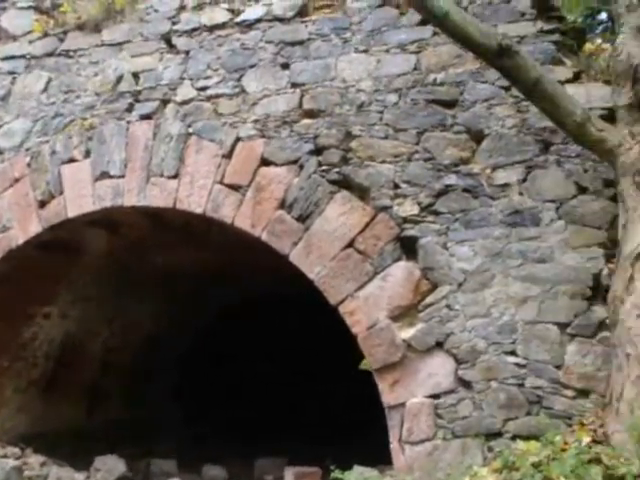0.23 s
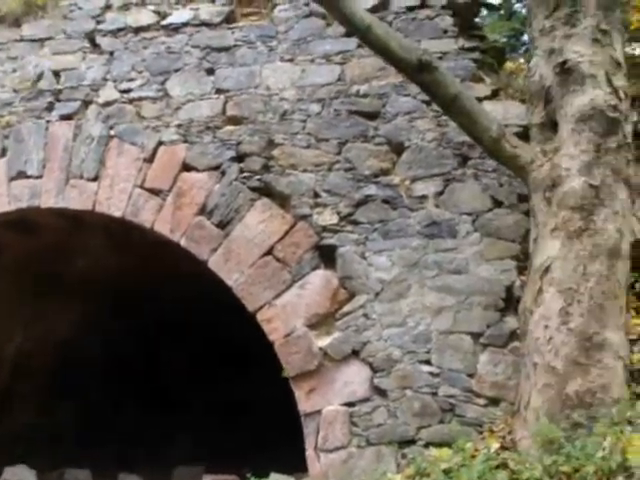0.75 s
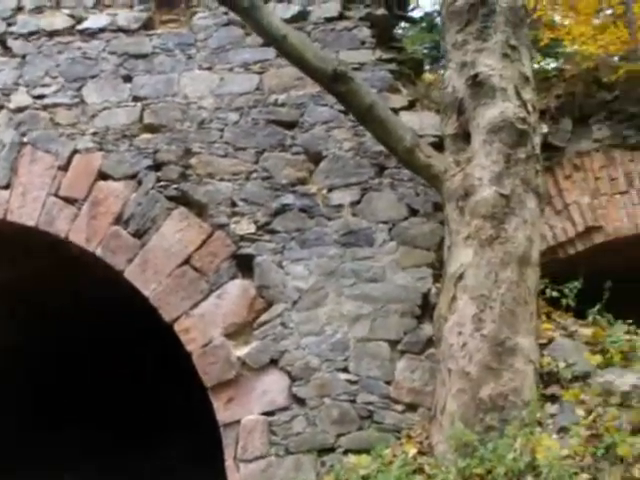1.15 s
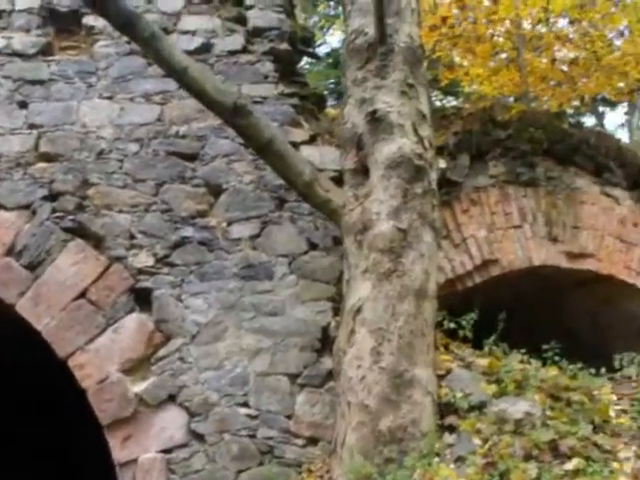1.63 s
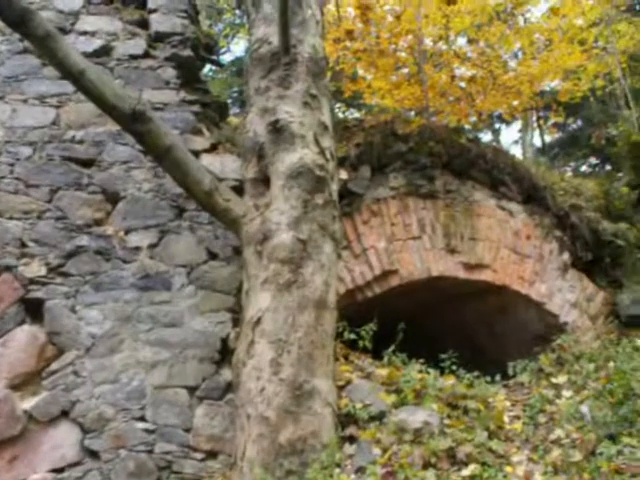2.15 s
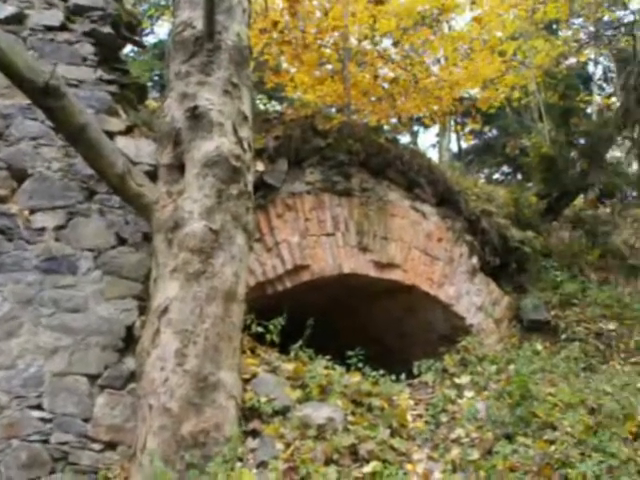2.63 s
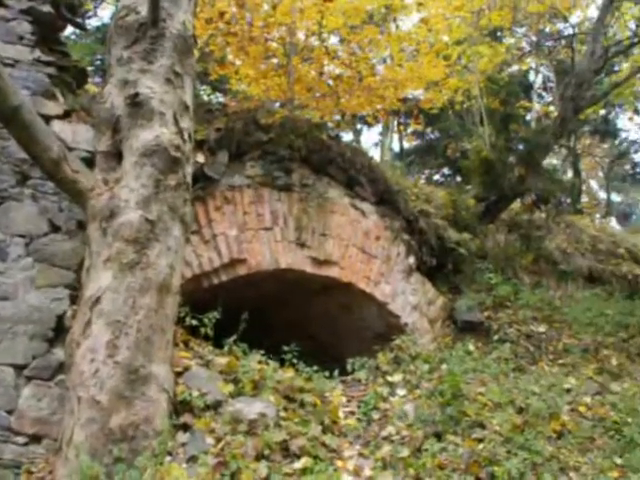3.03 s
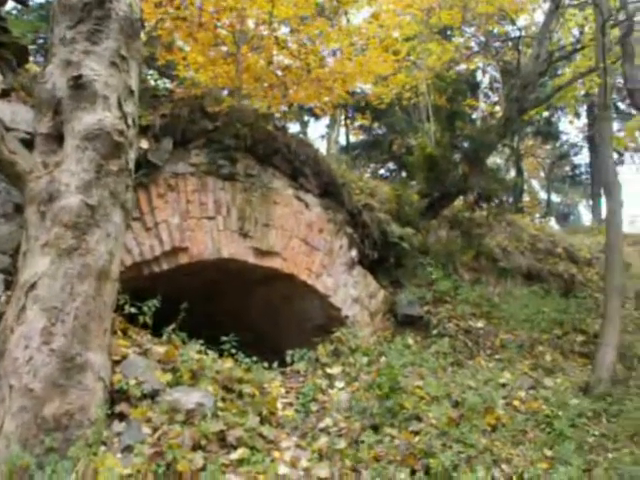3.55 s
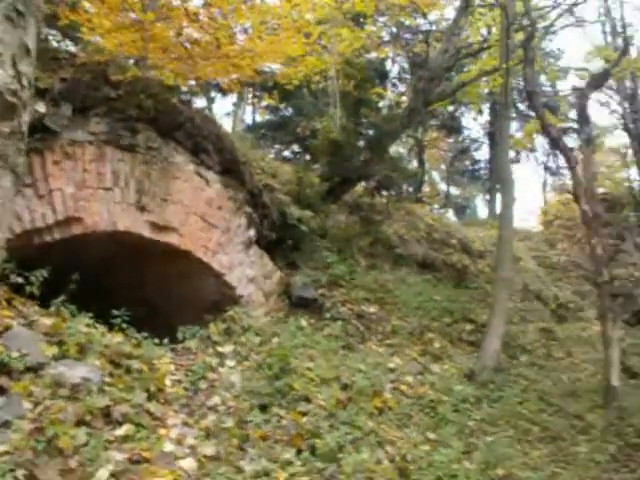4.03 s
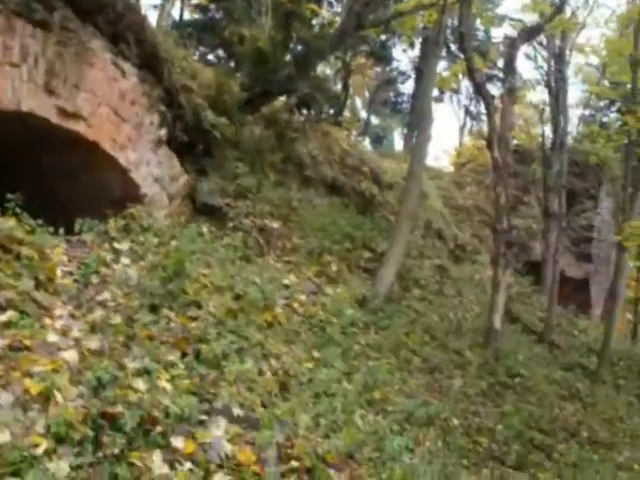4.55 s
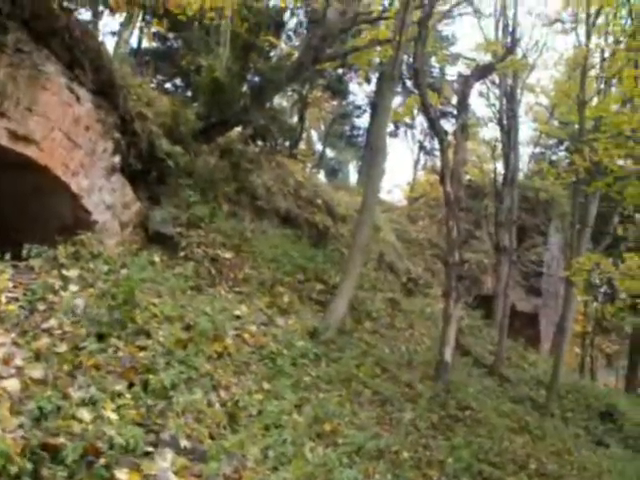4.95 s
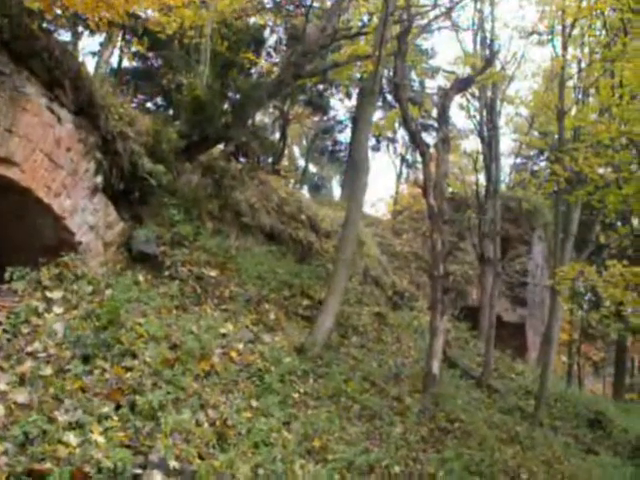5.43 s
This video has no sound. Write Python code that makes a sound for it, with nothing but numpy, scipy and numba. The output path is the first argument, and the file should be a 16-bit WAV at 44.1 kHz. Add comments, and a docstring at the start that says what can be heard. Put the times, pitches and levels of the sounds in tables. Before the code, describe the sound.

A steady hiss with a faint high whine runs throughout, over a soft, uneven wind rumble. From about 0.3 seconds, dry leaves rustle faintly under shifting feet in a wood, with a light tap on the handheld camera at 0.7. The rustle grows between 1.4 and 1.9 seconds, and several brittle leaf snaps follow one another until 2. Close, sharp knocks on the camera's plastic casing ring briefly at about 1.4, 2 and 2.2 seconds, then loudest at 2.9, 3.6 and 4.1, with lighter taps between. More leaves snap from 4.2 to 4.7 seconds. From 4.8 to 5.3, fingers scrape and tap on the casing in quick little strokes while low puffs of wind hit the microphone. The wind rumble swells around 4.8 seconds and again at the end, near 5.6.

```python
"""Dry leaves and a handheld camera

Someone shifts their feet in a wood, and dry leaves rustle and snap below. The small camera in their
hand rings when its plastic casing is knocked and scrapes when fingers slide over it. Wind rumbles
and puffs on the microphone, over the amplifier's steady hiss and whine."""
import sys
import numpy as np
from scipy import signal
from scipy.fft import rfft, irfft
from scipy.io import wavfile
from scipy.ndimage import uniform_filter1d
from numba import njit

SR = 44100
rng = np.random.default_rng(int(sys.argv[2]) if len(sys.argv) > 2 else 0)


def store_wav(level_fs):
    """Save 16-bit WAV to argv[1]."""
    pcm = np.round(np.clip(np.atleast_2d(level_fs), -1, 1) * 32767)
    wavfile.write(sys.argv[1], SR, pcm.T.astype(np.int16))


N = 250488


def gain(db):
    return 10 ** (np.asarray(db) / 20)


def unit_level(x):
    return x / np.sqrt(np.mean(x ** 2))


def add_at(out, sound, start_s):
    i = int(start_s * SR)
    out[i:i + len(sound)] += sound[:N - i]


def curves(tables, rest_db=-65.0):
    """Join timed rows into one curve per column; the level sinks to rest between tables."""
    rows = []
    for table in tables:
        first, last = table[0], table[-1]
        rows += [(first[0] - .006, rest_db, *first[2:]), *table, (last[0] + .012, rest_db, *last[2:])]
    times, *columns = np.transpose(rows)
    return [np.interp(np.arange(N) / SR, times, column) for column in columns]


def wander(per_s):
    """A smooth random drift, about 1 in size, that heads for a new value per_s times a second."""
    hold = int(SR / per_s)
    steps = np.repeat(rng.standard_normal(N // hold + 1), hold)
    return 1.22 * uniform_filter1d(uniform_filter1d(steps, hold), hold)[:N]


LOW, BAND, HIGH = 0, 1, 2
@njit
def split(x, hz, damping):
    """Split a sound into what lies below (LOW), around (BAND) and above (HIGH) a moving frequency."""
    low, band = np.empty(len(x)), np.empty(len(x))
    band_memory, low_memory = 0., 0.
    for i in range(len(x)):
        step = np.tan(np.pi * hz[i] / SR)
        swing = (band_memory + step * (x[i] - low_memory)) / (1 + step * (step + damping))
        low[i], band[i] = low_memory + step * swing, damping * swing
        band_memory, low_memory = 2 * swing - band_memory, low_memory + 2 * step * swing
    return low, band, x - low - band


def ring(hz, db, fade_s, rise_s):
    """Tones set off by a push: they build over about rise_s and lose 60 dB in fade_s."""
    t = np.arange(SR // 5) / SR
    tones = np.sin(2 * np.pi * np.outer(hz, t)) * np.exp(-np.log(1000) * np.outer(1 / fade_s, t))
    return gain(db) @ tones * (1 - np.exp(-t / rise_s)) ** 2


def clicks(per_s, spread_db):
    """Random clicks, mostly small, a few larger."""
    hits = rng.random(N) < per_s / SR
    return unit_level(hits * rng.choice([-1., 1.], N) * gain(spread_db * rng.exponential(size=N)))


# How strong the hiss is from bass to treble: f/Hz, relative level/dB
HISS_SHAPE = [(60, -29), (100, 0), (360, -0.5), (700, -1.2), (2400, -2), (4900, -2.5), (5300, -6.5),
              (5520, -10.5), (5900, -11.5), (6300, -17.5), (6700, -28), (8100, -64)]
# The amplifier's two thin tones: f/Hz, level/dB
WHINE_TONES = [(5012, -56), (6013, -65)]
def amplifier(hiss_db=-36, readout_hz=59.94):
    """Two faint whines, and a smooth hiss that dips briefly each time the camera's sensor is read."""
    t = np.arange(N) / SR
    whine = sum(gain(db) * np.sqrt(2) * np.sin(2 * np.pi * hz * t) for hz, db in WHINE_TONES)
    shape_hz, shape_db = np.transpose(HISS_SHAPE)
    all_hz = np.fft.rfftfreq(N, 1 / SR) + 1
    shape = gain(np.interp(np.log(all_hz), np.log(shape_hz), shape_db))
    hiss = unit_level(irfft(rfft(rng.standard_normal(N)) * shape, N))
    cycles_from_dip = (t * readout_hz - .445 + .5) % 1 - .5
    dip_db = -9 * np.exp(-(cycles_from_dip / .035) ** 2)
    return hiss * gain(hiss_db + .72 * wander(1.8) + dip_db) + whine


# The rise and fall of the wind: t/s, level/dB
GUSTS = [(0, -41.5), (.4, -40), (.65, -45.5), (1.3, -39), (1.75, -47), (2.0, -46.5), (2.17, -39.5),
         (2.35, -47.5), (2.56, -41.5), (3.2, -45), (3.55, -42), (3.75, -46.5), (4.0, -39.5), (4.15, -46.5),
         (4.6, -34), (4.8, -29.5), (5.15, -40.5), (5.4, -35), (5.65, -22.5), (5.68, -22.5)]
def wind():
    """Air swirling at the microphone makes an uneven rumble that reaches higher in stronger gusts."""
    db = curves([GUSTS])[0]
    edge_hz = np.clip(45 * gain(.34 * (db + 41)), 15, 300)
    rumble = split(rng.standard_normal(N), edge_hz, 1.7)[LOW]
    rumble = split(rumble, 5.3 * edge_hz, 1.8)[LOW] / np.sqrt(edge_hz)
    rumble = split(rumble, .17 * edge_hz, 1.2)[HIGH]
    return gain(db + 2.5 * wander(7.9)) * unit_level(rumble)


# Two stretches of leaves stirring underfoot, each with rows of: t/s, level/dB, centre f/Hz
LEAF_RUSTLES = [
    [(.3, -45.5, 1240), (.53, -48, 1506), (.62, -54, 1510), (.7, -45, 2180), (.78, -42.5, 2810),
     (.86, -68, 2510), (1.3, -45.5, 1460)],
    [(1.45, -36.5, 1030), (1.53, -38.5, 1175), (1.63, -34, 1180), (1.7, -36.5, 1280), (1.76, -43.5, 1184),
     (1.9, -50, 1106)],
]
def leaf_rustle():
    """Thousands of tiny cracks in dry leaves blur into a soft rustle."""
    db, hz = curves(LEAF_RUSTLES)
    cracks = clicks(per_s=6000, spread_db=1.5)
    for _ in range(2):
        cracks = split(cracks, hz, 1.5)[BAND]
    return gain(db + .59 * wander(40)) * unit_level(cracks)


# The tones the casing rings with; the last three are the dry crack of contact:
# f/Hz, level/dB when hit on the face, level/dB when hit on the edge, fade t/s
CASING_TONES = [(414.6, -16.5, 16.5, 0.14), (490, -13, -12, 0.22), (514, 5.5, 7, 0.087),
                (768, -3, 3, 0.094), (848.6, 0, 0.5, 0.08), (942, 5.5, 7.5, 0.04), (1003, -3, -19, 0.02),
                (1104, -7, -10.5, 0.042), (1361, -8.5, -20.5, 0.047), (1469, -11.5, -7.5, 0.058),
                (1548, -4, -5, 0.039), (1641, -4.5, -4, 0.043), (1697, -3.5, -16, 0.049),
                (1866, -1.5, -2.5, 0.049), (2110, -6, -7.5, 0.056), (2212, -11, -22, 0.063),
                (2597, -8, 10, 0.03), (2740, -5, 1.5, 0.039), (3180, 2, 4.5, 0.028),
                (3500, -2.5, 3.5, 0.03), (4076, -0.5, -11.5, 0.036), (1397, -1, -6.5, 0.0078),
                (1946, -4.5, -7, .014), (3435, 3, 9, 0.0091)]
# Borders between the tones of the shell, back panel, lid, front panel and small parts: f/Hz
PART_BORDERS = [620, 1100, 1590, 2450]
# Blows on the casing: t/s, front panel level/dB, shell and lid level/dB (each relative to the front),
# fade time multiplier, where it lands (0 face, 1 edge), push t/ms
CASING_KNOCKS = [(0.698, -24, -10.5, 4, 0.41, 0.65, 0.29), (1.430, -6.5, -11, 3.5, 0.65, 0.1, 0.57),
                 (1.438, -18.5, 0.5, -8, 0.92, 0.18, 1.3), (1.950, -12.5, -17.5, 3.5, 0.88, 0.88, 1.1),
                 (2.2268, -7, -10, 4.5, 0.87, 0.08, 0.5), (2.270, -20.5, -12.5, 2.5, 0.92, 0.2, 0.32),
                 (2.933, 2, -15.5, 0.5, 0.94, 0.08, 0.91), (2.9417, -9, -4.5, 4, 0.87, 0.07, 0.4),
                 (3.021, -19.5, -6.5, 10, 0.68, 0.4, 0.88), (3.5797, 5.5, -13, -5, 0.96, 0.08, 0.69),
                 (3.586, -4.5, -8, -7, 0.44, 0.3, 0.6), (3.947, -23.5, -10, 3.5, 0.76, .7, 0.44),
                 (4.0018, -12.5, -9.5, 6, 0.53, 0.4, 0.57), (4.058, -32, -9, -2, 0.67, 0.94, 0.74),
                 (4.1276, 2.5, -19, -0.5, 0.56, 0.44, 0.7), (4.184, -22.5, -13.5, 4.5, 0.97, .4, 0.71),
                 (4.8315, -14.5, -10, -3.5, 1.17, 0.33, .4), (5.0916, -31, -6, 3, .6, 0.3, .5),
                 (5.131, -28, -17, -3, .53, 0.5, .5), (5.1533, -12.5, -20, -4.5, 0.52, 0.1, 0.14),
                 (5.2051, -11.5, -10, -2, 0.71, 0, 0.66), (5.234, -17, -14, -6, 0.76, 0.3, 0.46),
                 (5.285, -28, -15, 1.5, .4, 0.4, .4)]
def casing_knocks():
    """Each blow rings all the casing's tones, coloured by where it lands; the grip detunes them a bit."""
    hz, face_db, edge_db, fade_s = np.transpose(CASING_TONES)
    part = np.searchsorted(PART_BORDERS, hz)
    out = np.zeros(N)
    for start, front_db, shell_db, lid_db, fade_scale, edge, push_ms in CASING_KNOCKS:
        detune, scatter = rng.standard_normal((2, len(hz)))
        db = face_db + edge * (edge_db - face_db) + 1.2 * scatter
        back_db = -15 + 16.5 * edge  # edge blows wake the back panel
        small_parts_db = lid_db - 14  # they sit on the lid and move with it
        db += front_db + np.array([shell_db, back_db, lid_db, 0, small_parts_db])[part]
        add_at(out, ring(hz * (1 + .004 * detune), db, fade_s * fade_scale, push_ms / 1000), start)
    return split(out, np.full(N, 320.), 2.54)[HIGH]  # so small a box gives off no bass


# Single leaves breaking: t/s, level/dB, crack f/Hz, relative thud level/dB
LEAF_SNAPS = [(1.5907, -11, 2250, -5), (1.6408, -14, 2550, -5.5), (1.7728, -13.5, 2480, -2),
              (1.8362, -15.5, 2500, -2), (1.8815, -16.5, 2280, -5), (2.03, -13.5, 2500, -4.5),
              (4.2111, -8, 2230, -11), (4.438, -17.5, 2500, -9), (4.5, -17, 2760, -10),
              (4.594, -13, 2750, -13), (4.645, -22.5, 1780, -11), (4.658, -23, 1910, -14)]
def leaf_snaps():
    """A brittle leaf gives a very short crack, with a thud about an octave below and a spray above."""
    out = np.zeros(N)
    fade_s = np.array([.0092, .011, .011, .0069, .0032])
    for start, db, crack_hz, thud_db in LEAF_SNAPS:
        tones_hz = crack_hz * np.array([.46, .9, 1.15, 1.6, 2.2])
        tones_db = db + np.array([thud_db, -3, -5, -7, -11])
        add_at(out, -ring(tones_hz, tones_db, fade_s, rise_s=.0001), start)
    return out


# Fingers sliding on the casing: start t/s, length t/s, level/dB, extra treble level/dB
FINGER_SLIDES = [(2.271, 0.022, -36, 9), (4.838, .02, -38.5, 1), (4.869, 0.038, -33, 2),
                 (4.92, 0.033, -51, -4), (5.003, 0.051, -43, -6.5), (5.133, 0.031, -29.5, -1.5),
                 (5.205, 0.036, -33.5, -0.5), (5.259, 0.038, -46, -3), (5.307, .015, -43.5, -4)]
def finger_rubs(grip_s=.008, fade_db_per_s=59, let_go_db_per_s=899):
    """Skin sticks and slips in tiny jerks that ring the casing, while the hand shortens the ringing."""
    hz, face_db, edge_db, fade_s = np.transpose(CASING_TONES)
    part_db = np.array([-12, -10, 2.5, 5, -14])[np.searchsorted(PART_BORDERS, hz)]
    tones_db = (face_db + edge_db) / 2 + part_db
    out = np.zeros(N)
    for tones, treble_share in ((hz < PART_BORDERS[1], -.5), (hz > PART_BORDERS[1], .5)):
        pressure = np.zeros(N)
        for start, length, db, treble_db in FINGER_SLIDES:  # grip quickly, fade slowly, let go
            t = np.arange(N) / SR - start
            grip = np.clip(1 + t / grip_s, 0, 1)
            fade_db = fade_db_per_s * np.maximum(t, 0) + let_go_db_per_s * np.maximum(t - length, 0)
            pressure += grip * gain(db + treble_share * treble_db - fade_db)
        slips = clicks(per_s=1600, spread_db=1) * pressure * gain(3.5 * wander(60))
        casing = ring(hz[tones], tones_db[tones], .6 * fade_s[tones], rise_s=.0003)
        out += signal.fftconvolve(slips, casing / np.sqrt(np.sum(casing ** 2)))[:N]
    return out


# Small swirls of air hitting the microphone: t/s, level/dB, f/Hz
WIND_PUFFS = [(4.783, -18.5, 59.7), (4.915, -16.5, 80), (5.268, -17.5, 150)]
def wind_puffs():
    """Each swirl pushes the microphone's thin skin in; it swings back and quickly settles."""
    out = np.zeros(N)
    for time, db, hz in WIND_PUFFS:
        swing = ring([hz], [db], fade_s=np.array([5.3 / hz]), rise_s=.14 / hz)
        add_at(out, -swing, time - .25 / hz)  # start a quarter of a cycle early
    return out


def scene():
    """All the sounds added into one channel."""
    camera_and_leaves = casing_knocks() + leaf_snaps() + finger_rubs() + leaf_rustle()
    return (camera_and_leaves + wind() + wind_puffs() + amplifier())[None]


def record(dry):
    """The camera's converter cuts the high treble; loud knocks then bend and flatten, spraying treble."""
    converter_hz, top_hz = 6700, 15400
    headroom, bend_sharpness = 1.3, 6.
    converter = signal.ellip(8, .3, 75, converter_hz, fs=SR, output="sos")
    dulled = signal.sosfilt(converter, dry) - .004  # the wave sits slightly below zero
    bent = dulled / (1 + np.abs(dulled / headroom) ** bend_sharpness) ** (1 / bend_sharpness)
    top_cut = signal.ellip(8, .2, 60, top_hz, fs=SR, output="sos")
    return signal.sosfilt(top_cut, np.clip(bent, -1, 1))


dry = scene()
out = record(dry)
store_wav(out)
```